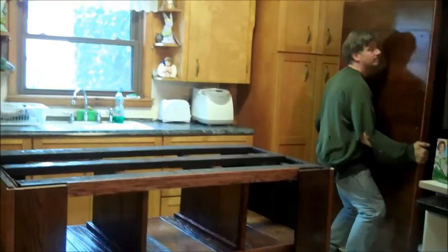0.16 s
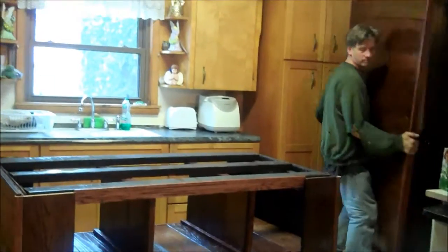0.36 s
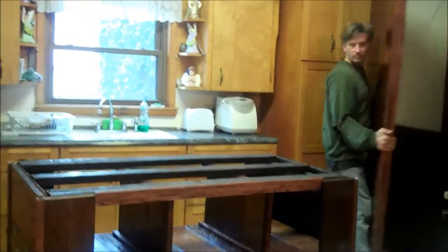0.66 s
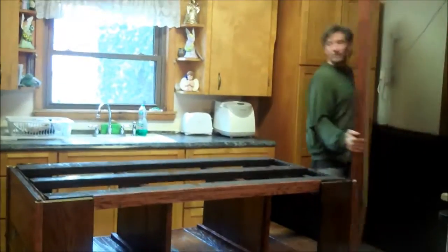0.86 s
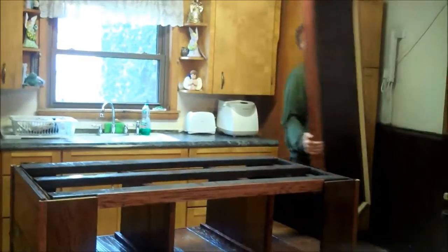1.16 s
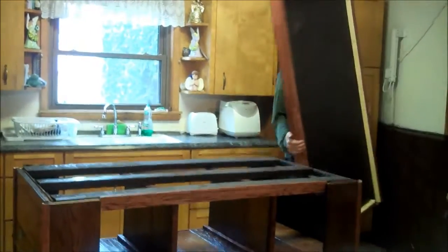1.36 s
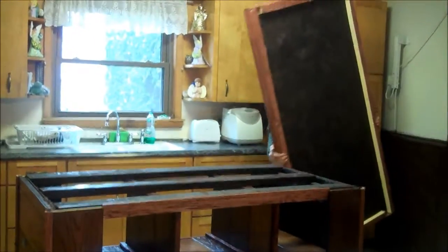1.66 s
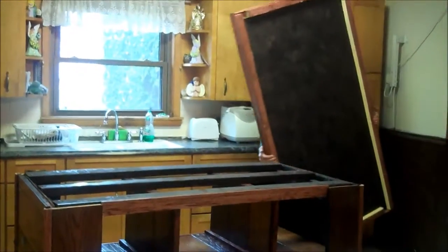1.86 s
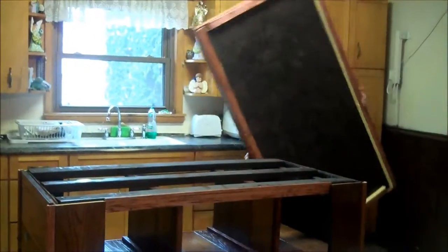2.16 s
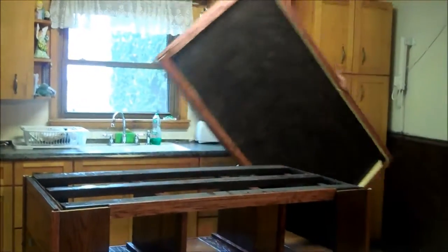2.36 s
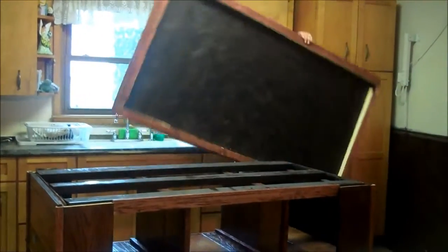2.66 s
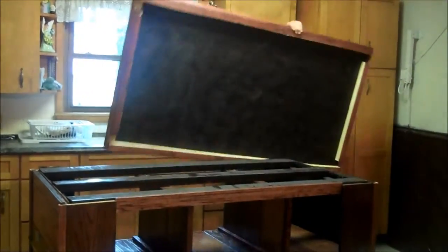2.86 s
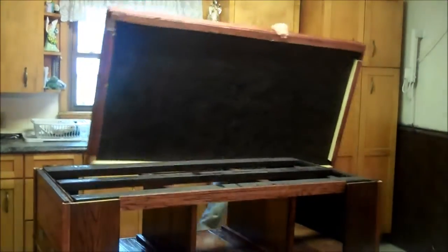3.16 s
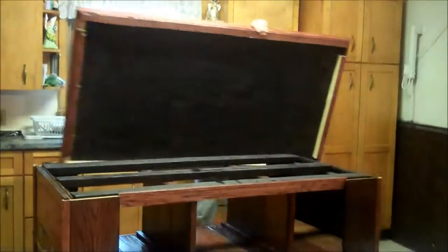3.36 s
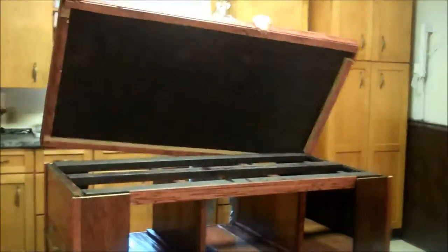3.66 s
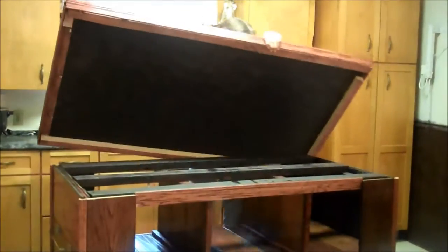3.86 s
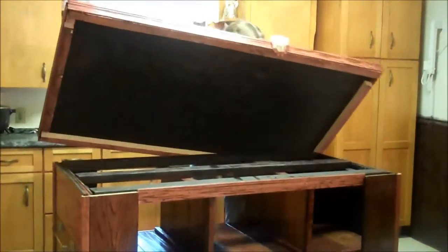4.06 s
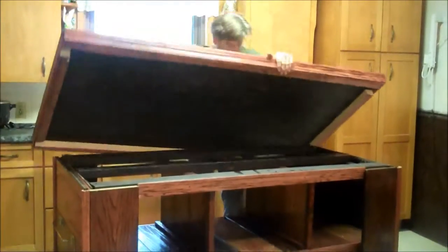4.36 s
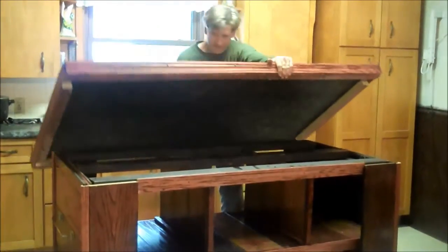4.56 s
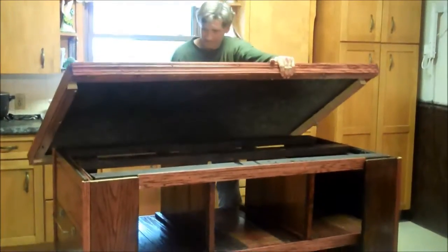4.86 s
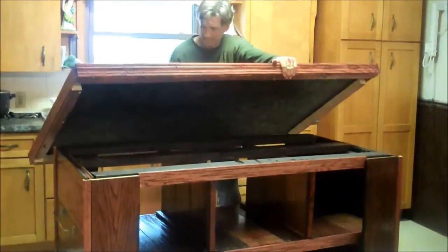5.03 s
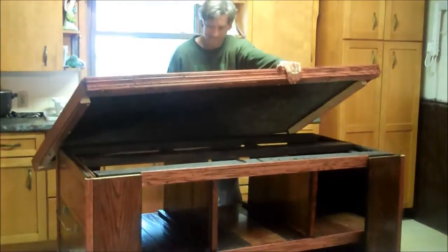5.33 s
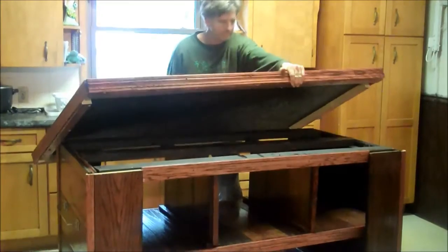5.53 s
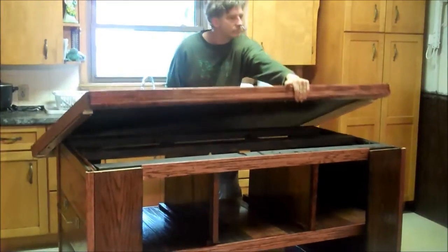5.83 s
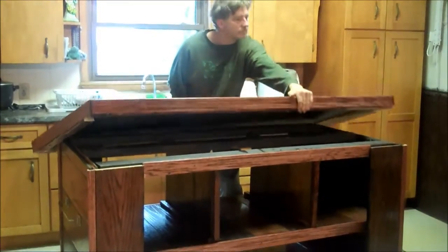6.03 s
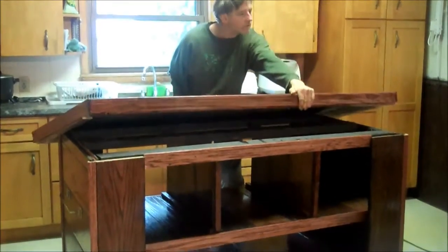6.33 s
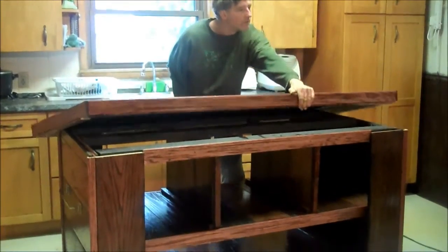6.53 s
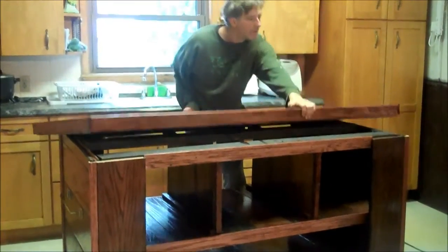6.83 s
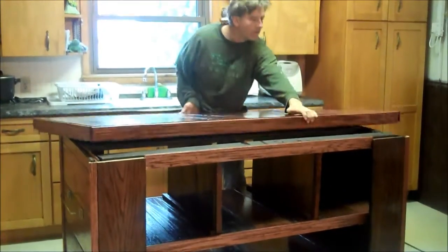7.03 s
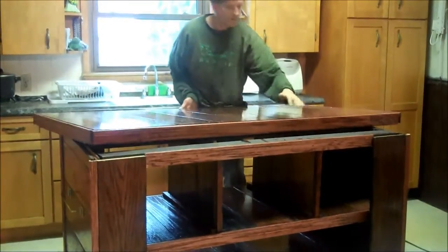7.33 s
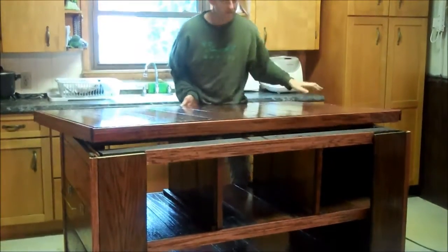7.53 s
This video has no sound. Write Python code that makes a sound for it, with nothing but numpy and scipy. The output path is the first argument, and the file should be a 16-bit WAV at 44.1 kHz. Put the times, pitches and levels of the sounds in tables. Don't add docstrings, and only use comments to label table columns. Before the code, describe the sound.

A heavy wooden tabletop is shuffled, ticked and creaked into place in a kitchen, with a brief squeak, one loud crack and settling thuds.

```python
import sys
import numpy as np
from scipy import signal
from scipy.fft import rfft, irfft, next_fast_len
from scipy.io import wavfile
from scipy.ndimage import uniform_filter1d

SR = 44100
rng = np.random.default_rng(int(sys.argv[2]) if len(sys.argv) > 2 else 0)


def voltage_ratio(decibels):
    exponent = np.asarray(decibels, float) / 20
    return 10 ** exponent


def unload_wav(signal):
    wavfile.write(
        sys.argv[1],
        SR,
        np.round(np.clip(np.atleast_2d(signal).T, -1, 1) * 32767).astype(np.int16),
    )


N = 339349

# pitch_hz, level_db (per Hz)
AIR_COLOUR = [(65, -60), (110, -9.5), (203, -12), (248, 0), (305, 0), (324, -2.5), (366, -25), (389, -3.5),
              (584, -7), (992, -5.5), (1270, -10.5), (1370, -16), (6730, -11), (7760, -3), (8600, -9.5),
              (10300, -14.5), (14300, -21.5)]
# pitch_hz, left_right_likeness
AIR_LIKENESS = [(60, 0.066), (180, 1), (540, 0.77), (1600, 0.016), (4790, -0.054), (14300, -0.15)]
# pitch_hz, level_db (rms)
MOTOR_HUM = [(59.2, -68), (118.4, -77), (296.1, -70), (360.7, -71)]
# pitch_hz, level_db (per Hz)
CLOTH_COLOUR = [(1290, -9), (2200, -5.5), (2870, -8), (3410, -7.5), (3900, -7.5), (5330, -9.5),
                (7700, -3.5), (8200, -4), (9300, -12), (11800, -25.5), (12700, -23), (14300, -25.5)]
# pitch_hz, level_db (per Hz)
SOLE_COLOUR = [(240, -38), (400, -25.5), (454, 1), (497, -18), (748, -2), (1310, -6), (3500, -13),
               (4550, -26), (7700, -120)]
# pitch_hz, level_db (per Hz)
BOARDS_COLOUR = [(65, -34), (110, -1), (166, -1), (200, 17), (291, 0), (386, 0), (600, 3.5), (780, -49),
                 (1320, -120)]
# time_s, effort_db
DRAG = [(0, -54.5), (.1, -55), (.95, -52), (1.44, -62), (1.75, -50), (2.03, -69), (3.1, -59), (3.5, -53),
        (4.05, -64.5), (4.9, -50), (5.1, -64.5), (5.75, -56.5), (6.8, -54), (7.2, -57), (7.69, -53.5)]
# loudest_s, level_db, swell_s, fade_s
SWISHES = [(0.078, -34, 0.009, 0.053), (.36, -46.5, 0.77, 0.34), (0.569, -45, 0.072, 0.38),
           (.93, -46.5, .022, .09), (1.09, -43.5, 0.08, 0.29), (1.2, -49.5, 0.33, 0.42),
           (1.78, -50, 0.37, 0.15), (2.12, -48, .04, 0.1), (2.226, -42.5, .005, 0.2),
           (2.48, -41.5, 0.22, 0.4), (2.705, -37.5, 0.11, 0.16), (2.93, -36.5, 0.17, 0.18),
           (3.34, -49.5, 0.53, 0.76), (3.43, -41.5, 0.085, 0.16), (3.74, -42.5, .008, .07),
           (3.99, -44, 0.15, 0.16), (4.3, -52, .03, 0.081), (4.456, -40.5, .006, 0.05),
           (4.475, -44, .006, .1), (5.15, -39.5, 0.027, 0.095), (5.29, -51, .1, .05),
           (5.87, -48.5, 0.17, 0.096), (6.012, -43.5, .006, .04), (6.16, -39.5, 0.054, 0.06),
           (6.47, -45, 0.39, 0.056), (6.8, -51.5, 0.62, 0.076), (7.01, -46, 0.49, 0.07),
           (7.188, -42, 0.37, 0.082), (7.35, -45.5, 0.44, 0.16), (7.42, -45.5, .03, 0.19),
           (7.69, -45, 0.089, .1)]
# loudest_s, level_db, swell_s, fade_s, boards_db (re level)
SCUFFS = [(.08, -39.5, 0.015, 0.058, -19), (.36, -52.5, 1, 0.15, -18), (.67, -46.5, 0.13, 0.17, -16),
          (1.1, -47, 0.029, 0.26, -10), (1.499, -41, 0.014, 0.037, -29), (2.148, -48.5, 0.023, 0.09, -23),
          (2.23, -56, .06, .25, -8), (2.5, -46.5, 0.75, 0.23, -14), (2.92, -45, 0.27, .14, -6),
          (3.0, -48.5, .1, 0.14, -14), (3.83, -54.5, 0.13, 0.28, -2), (3.99, -51, 0.16, 0.1, -16),
          (4.35, -54, 0.17, 0.066, -21), (4.46, -47, 0.015, 0.13, -23), (5.15, -44.5, 0.043, 0.21, -5),
          (5.29, -45.5, 0.1, 0.12, -13), (5.87, -42.5, 0.016, 0.14, -23), (6.15, -43.5, 0.04, 0.15, 3),
          (6.47, -45.5, 0.27, 0.09, -12), (7.11, -53, 0.14, 0.28, -13), (7.25, -41, 0.045, 0.1, -5),
          (7.42, -48.5, 0.12, 0.22, -8)]
# start_s, peak_db, wood_db (re peak), pitch_hz
TICKS = [(0.0724, -30, -6, 1680), (0.0851, -41, 2, 1900), (0.5538, -33, -14, 1890),
         (0.6572, -39.5, -6, 980), (0.678, -46, 5, 1095), (1.4859, -46, 12, 955), (1.488, -50, 8, 760),
         (2.1188, -49, -15, 786), (2.225, -38, -11, 730), (2.906, -29, -11, 1590), (3.6072, -35, -9, 970),
         (3.807, -42, 2.5, 831.5), (4.455, -48, 5, 1980), (5.157, -36.5, 0.5, 983),
         (5.2756, -33, -10, 1700), (5.7628, -32, -11.5, 840), (5.8625, -25.5, -11, 1780),
         (6.1088, -47, 9, 904), (6.1502, -31.5, -21, 897), (6.1544, -33, -19, 759), (6.426, -34, -8, 2070),
         (6.4535, -27, -18, 972), (7.0874, -40, 0.5, 860), (7.337, -33, -16, 1110), (7.424, -34, -14, 1960)]
# start_s, peak_db, wood_db (re peak), pitch_hz, t60_s
KNOCKS = [
    (0.688, -47, 12.5, 1440, 0.013),
    (1.488, -44.5, 10.5, 1690, 0.014),
    (5.863, -35.5, 13, 2400, 0.0047),
    (3.646, -40, 8, 1540, 0.0054),
    (4.1, -53, 6, 470, 0.073),
    (4.11, -48, 11, 730, 0.022),
    (6.1166, -36.5, 16, 1054, 0.0075),
    (6.133, -54, 15, 806, 0.022),
    (7.234, -47.5, 11, 826, 0.02),
]
# left_s, right_s, level_db
REFLECTIONS = [(.0021, .0026, -9), (.0043, 0.0071, -2.5), (.0066, 0.0082, -9), (0.0118, 0.0081, -6.5),
               (0.016, 0.014, -12.5)]
# pitch_hz, t60_s
KITCHEN_DECAY = [(50, 0.037), (150, 0.6), (400, 0.79), (900, 0.52), (2000, 0.46), (5000, 0.45),
                 (9000, 0.45), (10500, 0.35), (14000, 0.25)]
# pitch_hz, left_right_likeness
ROOM_LIKENESS = [(60, 1), (180, 0.84), (540, 1), (1600, 0.6), (4790, 0.095), (14300, 0.057)]
# start_s, length_s, pitch_hz, level_db
CREAKS = [(0.422, 0.03, 815, -47), (2.13, 0.047, 856, -52), (2.223, 0.22, 732, -50),
          (2.38, 0.054, 807, -48), (2.985, 0.06, 1490, -49), (3.79, 0.043, 842, -47),
          (4.831, 0.36, 876, -54.5), (4.845, 0.14, 1000, -51), (5.138, 0.052, 990, -53),
          (6.439, 0.05, 950, -50), (7.079, 0.088, 917, -45), (7.125, 0.041, 2045, -44.5)]
# start_s, length_s, pitch_hz, level_db, width_hz
RASPS = [(.668, 0.05, 1900, -49, 1800), (3.418, 0.066, 3400, -42, 1800), (.71, 0.047, 1400, -51, 1000),
         (1.22, 0.11, 1510, -50, 500), (1.22, 0.11, 3300, -57, 900), (1.487, 0.066, 1800, -49.5, 900),
         (1.49, 0.083, 910, -50, 400), (5.861, .04, 2000, -47, 2200), (2.895, .09, 610, -43, 600),
         (3.64, 0.036, 1500, -47, 1000), (4.467, 0.06, 2000, -53, 1210), (6.51, 0.11, 1540, -52.5, 200),
         (6.575, 0.087, 1500, -56, 200), (6.615, .08, 1510, -58, 200), (6.455, .05, 2100, -57, 200),
         (7.336, 0.022, 4000, -44, 4000)]
# start_s, peak_db, pitch_hz, t60_s, boom_db (re peak)
THUDS = [(0.636, -39.5, 299, 0.23, -31), (0.927, -38, 179, 0.091, -27), (1.487, -39, 129, 0.14, -32),
         (2.155, -36.5, 154, 0.11, -24), (2.907, -39, 368, 0.13, -31), (3.164, -39, 160, 0.13, -25),
         (3.811, -33, 207, 0.091, -27), (4.098, -29.5, 207, 0.086, -20), (4.335, -45, 277, 0.15, -26),
         (4.457, -42, 336, 0.12, -29), (4.645, -24.5, 134, 0.18, -13), (4.871, -30, 133.5, 0.089, -27),
         (6.13, -29, 251, 0.081, -37), (6.137, -24, 148, 0.091, -20), (6.81, -44, 301, 0.18, -30),
         (7.231, -16, 169, 0.11, -37), (7.262, -19, 222.3, 0.11, -28), (7.353, -30.5, 155, 0.17, -27),
         (7.379, -30.5, 245, 0.11, -19), (7.449, -36, 238, 0.11, -27)]
# start_s, peak_db, centre_hz, width_hz
SNAPS = [(0.659, -36, 2500, 2500), (.6885, -33, 1500, 1800), (.7222, -45, 1500, 1800),
         (1.105, -39.5, 5000, 5000), (2.2233, -36, 5500, 6000), (2.4775, -34, 6500, 3500),
         (3.7342, -30, 7300, 4000), (3.8075, -35, 1200, 1500), (4.4535, -39, 2200, 2000),
         (4.473, -31, 7200, 4000), (5.1437, -40, 5000, 5000), (5.7617, -34, 3500, 4000),
         (5.8607, -27, 4000, 6500), (5.8636, -29, 3500, 5000), (6.009, -33, 5500, 5500),
         (6.0878, -34, 5000, 5060), (7.3077, -35, 6600, 5000), (7.4208, -23, 4460, 6460),
         (7.4532, -29, 5300, 2500), (7.665, -38, 5000, 5000)]
# time_s, pitch_hz, level_db
SQUEAK = [
    (4.103, 1500, -35),
    (4.1062, 1593, -14),
    (4.112, 1649, -20),
    (4.118, 1700, -13),
    (4.121, 1664, -29),
    (4.127, 1624, -19.5),
    (4.135, 1582, -23),
    (4.142, 1595, -26.5),
    (4.148, 1650, -31),
]
# multiple, level_db
SQUEAK_ORDERS = [(1, -1.5), (2, -4.5), (3, -11), (4, -16), (5, -15), (6, -27), (7, -34)]
# start_s, level_db, length_s
CRACK = [(4.6245, -30, .002), (4.626, -21, .002), (4.6275, -15, .002), (4.6285, -13, .0015),
         (4.6297, -5, .0012), (4.6308, -3.5, .0015), (4.6322, -12, .002), (4.6361, -13, .003),
         (4.6385, -18, .002), (4.6415, -17, .002), (4.6465, -20, .002), (4.652, -23, .002),
         (4.66, -23, .002)]
# pitch_hz, level_db (per Hz)
CRACK_COLOUR = [(24, -39), (40, -8), (86, -14), (295, -15.5), (333, -18), (387, -11), (574, -11),
                (699, -3.5), (950, -3), (1500, -6.5), (2020, -4.5), (4200, -7), (6120, -9.5), (7450, -2.5),
                (8600, -4), (10000, -13.5), (14500, -21)]
# pitch_hz, width_hz, level_db
PORT_RING = (7900, 800, 27.5)
# pitch_hz, left_right_db
PORT_COLOURS = [(60, -5.5), (130, -2.5), (290, -3), (630, -4.5), (1370, -2), (3000, 1), (6550, 4),
                (14300, 0.5)]

TICK_PAN_DB = 2


def evened(x):
    return x / np.sqrt(np.mean(x ** 2) + 1e-20)


def read(points, hz):
    f, value = np.transpose(points)
    return np.interp(np.log(hz + 1), np.log(f + 1), value)


def add(mix, s, sound, pan_db=0.):
    part = mix[:, round(s * SR):][:, :len(sound)]
    part += voltage_ratio(np.array([[pan_db / 2], [-pan_db / 2]])) * sound[:part.shape[1]]


def pair(frames, hz, likeness):
    a, b, c, d = rng.standard_normal((frames, len(hz), 4)).T
    same = np.clip(read(likeness, hz), -1, 1)[:, None]
    left, other = a + 1j * b, c + 1j * d
    return np.array([left, same * left + np.sqrt(1 - same ** 2) * other])


def ring(x, hz, width_hz):
    return signal.lfilter(*signal.iirpeak(hz, hz / width_hz, SR), x)


def ring_twice(x, hz, width_hz):
    return ring(ring(x, hz, width_hz), hz, width_hz)


def burst(length_s, noise):
    u = np.arange(len(noise)) / SR / length_s
    return noise * np.e * u * np.exp(-u) / 2


def floor():
    hz, t = np.fft.rfftfreq(2048, 1 / SR), np.arange(N) / SR
    colour = voltage_ratio(np.maximum(read(AIR_COLOUR, hz), -28.0))[:, None]
    spectra = pair(N // 512 + 5, hz, AIR_LIKENESS) * colour
    air = voltage_ratio(-53) * evened(signal.istft(spectra, nperseg=2048, noverlap=1536)[1][:, :N])
    hum = sum(np.sqrt(2) * voltage_ratio(db) * np.sin(2 * np.pi * (f * t + rng.random())) for f, db in MOTOR_HUM)
    waver = 1 + .18 * evened(uniform_filter1d(rng.standard_normal(N), 3000))
    return air + waver * hum


def stroke(t, s, db, swell_s, fade_s):
    distance = np.where(t < s, (s - t) / swell_s, (t - s) / fade_s)
    return voltage_ratio(2 * (db - 19 * distance))


def shuffle(patchy_db=2.0, flicker_db=1.0, level_db=1.0):
    frames, hz = N // 128 + 5, np.fft.rfftfreq(512, 1 / SR)[:, None]
    t = np.arange(frames) * 128 / SR
    drag = voltage_ratio(2 * np.interp(t, *np.transpose(DRAG)))
    drag_cloth_db, drag_boards_db, mover_pan_db = -9, -9, 1
    cloth = drag * voltage_ratio(2 * drag_cloth_db) + sum(stroke(t, *row) for row in SWISHES)
    sole, boards = drag, drag * voltage_ratio(2 * drag_boards_db)
    for *scuff, boards_db in SCUFFS:
        power = stroke(t, *scuff)
        sole = sole + power
        boards = boards + power * voltage_ratio(2 * boards_db)

    power = 0
    for colour, level in ((CLOTH_COLOUR, cloth), (SOLE_COLOUR, sole), (BOARDS_COLOUR, boards)):
        layer = voltage_ratio(2 * read(colour, hz)) * (hz >= colour[0][0]) * (hz <= colour[-1][0])
        power = power + layer / layer.sum() * level
    chance = rng.standard_normal((frames, len(hz))).T
    patches = evened(uniform_filter1d(uniform_filter1d(chance, 5, 0), 14, 1))
    flicker = evened(uniform_filter1d(uniform_filter1d(chance, 120, 0), 3, 1))
    unevenness = voltage_ratio(patchy_db * patches + flicker_db * flicker)
    spectra = pair(frames, hz[:, 0], ROOM_LIKENESS) * np.sqrt(power) * unevenness
    spectra *= voltage_ratio(np.array([[.5], [-.5]]) * mover_pan_db)[:, None]
    return voltage_ratio(level_db) * signal.istft(spectra, nperseg=512, noverlap=384)[1][:, :N]


def ticks():
    rows = [(*tick, 0.025) for tick in TICKS] + list(KNOCKS)
    out, noise, t = np.zeros((2, N)), rng.standard_normal((len(rows), 3000)), np.arange(3000) / SR
    for (s, db, wood_db, hz, t60), row in zip(rows, noise):
        puff = burst(0.00075, row)
        bright = ring_twice(puff, 6400, 2800) + 2.3 * ring(ring(puff, 2900, 5000), 3030, 5100)
        modes = np.sin(2 * np.pi * hz * t) + 0.23 * np.sin(2 * np.pi * 1.6 * hz * t)
        wood = voltage_ratio(wood_db + 3.0 - 60 * t / t60) * modes * (1 - np.exp(-t / 0.00052))
        add(out, s - .001, voltage_ratio(db) * (1.02 * bright / abs(bright).max() + wood), TICK_PAN_DB)
    return out


def echoed(x):
    taps = np.zeros((2, SR // 40))
    taps[:, 0] = 1
    for left, right, db in REFLECTIONS:
        taps[[0, 1], [round(left * SR), round(right * SR)]] += voltage_ratio(db)
    return signal.oaconvolve(x, taps, axes=1)[:, :N]


def kitchen():
    frames, hz = SR // 64, np.fft.rfftfreq(256, 1 / SR)
    t = np.arange(frames) * 64 / SR
    decay = voltage_ratio(-60 * t / read(KITCHEN_DECAY, hz)[:, None])
    tail = signal.istft(pair(frames, hz, ROOM_LIKENESS) * decay, nperseg=256, noverlap=192)[1]
    tail *= np.clip(np.arange(tail.shape[1]) / SR / 0.0013 - .5, 0, 1)
    tail = signal.lfilter(*signal.butter(2, 125, "high", fs=SR), tail)
    return tail / np.linalg.norm(tail[0])


def creaks(creak_width_hz=110.0):
    rows = [(*creak, creak_width_hz) for creak in CREAKS] + list(RASPS)
    out, noise = np.zeros((2, N)), rng.standard_normal((len(rows), SR // 3))
    for (s, length, hz, db, width_hz), row in zip(rows, noise):
        whistle = evened(ring_twice(row, hz, width_hz))
        add(out, s, voltage_ratio(db + 4.0) * burst(length / 3, whistle))
    return out


def thuds():
    out, t = np.zeros((2, N)), np.arange(SR // 2) / SR
    attack = 1 - np.exp(-t / .007)
    spreads = rng.uniform(0.967, 0.999, (len(THUDS), 3))
    for (s, db, hz, t60, boom_db), spread in zip(THUDS, spreads):
        modes = np.sin(2 * np.pi * hz * t)
        modes += [.6, .5, .2] @ np.sin(2 * np.pi * hz * np.outer(spread * [.65, 1.3, 1.7], t))
        modes += voltage_ratio(boom_db + 17.0) * np.sin(2 * np.pi * 48 * t)
        add(out, s - .003, voltage_ratio(db - 6.0 - 60 * t / t60) * modes * attack)
    return out


def snaps(grain=0.35):
    out, noise = np.zeros((2, N)), rng.standard_normal((len(SNAPS), 400))
    for (s, db, hz, width_hz), row in zip(SNAPS, noise):
        click = ring_twice(signal.unit_impulse(400, 8) + grain * burst(0.00044, row), hz, width_hz)
        add(out, s - .0003, voltage_ratio(db) * click / abs(click).max(), TICK_PAN_DB)
    return out


def squeak(jitter=.021, dulling_db_per_s=45):
    s, pitch, level = np.transpose(SQUEAK)
    t = np.arange(s[0], s[-1], 1 / SR)
    wobble = evened(uniform_filter1d(rng.standard_normal(len(t)), 60))
    turns = np.cumsum(np.interp(t, s, pitch) * (1 + jitter * wobble)) / SR
    slips = 0
    for k, db in SQUEAK_ORDERS:
        dulling = dulling_db_per_s * (k - 3) * (t - s[1] - 0.0207)
        slips = slips + voltage_ratio(db - dulling) * np.cos(2 * np.pi * (k * turns + rng.random()))
    grit = ring_twice(rng.standard_normal(len(t)), 4300, 4200)
    rub = evened(ring(ring(rng.standard_normal(1500), 2000, 3000), 4500, 9000))
    scuff = voltage_ratio(-28.5) * burst(0.0049, rub)
    chirp = voltage_ratio(np.interp(t, s, level)) * (slips + 0.36 * grit)
    out = np.zeros((2, N))
    add(out, s[0], chirp * signal.windows.tukey(len(t), .12), 2.4)
    add(out, 4.097, scuff)
    return out + voltage_ratio(-2.5) * ring(out, 1622, 5.5)


def crack():
    (blows, clicks, snap), noise = np.zeros((3, 2, N)), rng.standard_normal((len(CRACK), 2000))
    for (s, db, length), row in zip(CRACK, noise):
        puff = burst(length / 2, row)
        puff *= np.sqrt(length * SR / 4) / np.linalg.norm(puff)
        add(blows, s - length / 2, voltage_ratio(db) * puff, 1.8)
        add(clicks, s - .0004, voltage_ratio([db]), -2.2)
    hz = np.fft.rfftfreq(4096, 1 / SR)
    gain = voltage_ratio(np.maximum(read(CRACK_COLOUR, hz), -60))
    colour = signal.minimum_phase(np.fft.fftshift(irfft(gain ** 2))[1:], method="homomorphic")
    colour /= np.linalg.norm(colour)
    add(snap, CRACK[4][0], voltage_ratio(15.0) * colour)
    broad = voltage_ratio(-1.5) * signal.oaconvolve(blows, colour[None], axes=1)[:, :N]
    port_hz, port_width_hz, port_db = PORT_RING
    return broad + voltage_ratio(port_db) * ring_twice(clicks, port_hz, port_width_hz), snap


def scene():
    tick, thud, chirp, (knock, snap), room = ticks(), thuds(), squeak(), crack(), kitchen()
    rubbing = creaks() + shuffle() + floor()
    click = snaps()
    sent = voltage_ratio(1.0) * tick + voltage_ratio(-2.5) * thud + voltage_ratio(-1.0) * chirp + snap + voltage_ratio(-6.0) * click
    wet = signal.fftconvolve(sent.mean(0)[None], room, axes=1)[:, :N]
    return echoed(tick) + thud + echoed(chirp) + knock + click + wet + rubbing


def low_pass(x):
    return signal.sosfilt(signal.butter(12, 14360, fs=SR, output="sos"), x)


def record(dry):
    size, edge_hz = next_fast_len(N + 4096), 14330
    hz = np.fft.rfftfreq(size, 1 / SR)
    colours = voltage_ratio(np.array([[.5], [-.5]]) * read(PORT_COLOURS, hz))
    ports = irfft(rfft(dry, size) * colours, size)
    clipped = np.clip(ports, -.95, .95)
    banded = irfft(rfft(clipped) * np.clip((edge_hz - hz) / 60, 0, 1), size)[:, :N]
    return low_pass(banded)


dry = scene()
out = record(dry)
unload_wav(out)
```